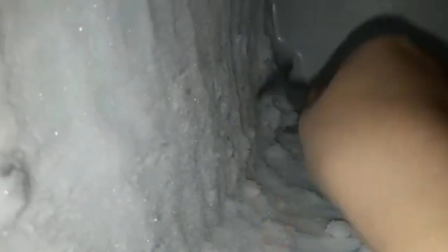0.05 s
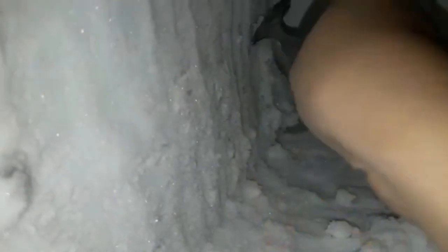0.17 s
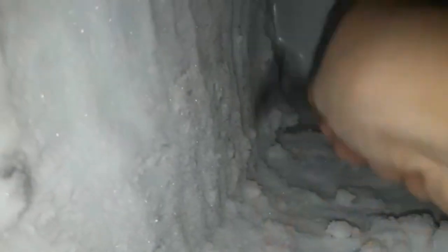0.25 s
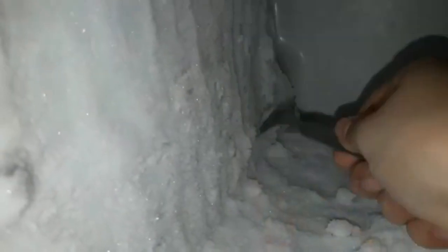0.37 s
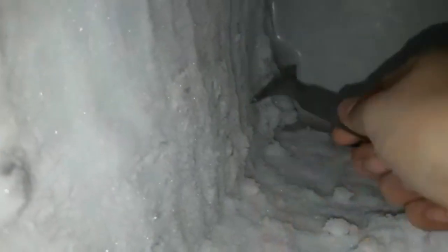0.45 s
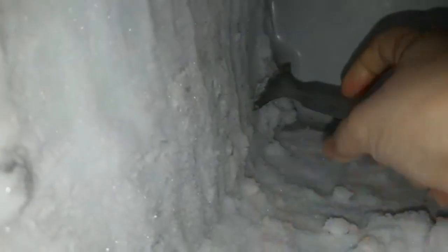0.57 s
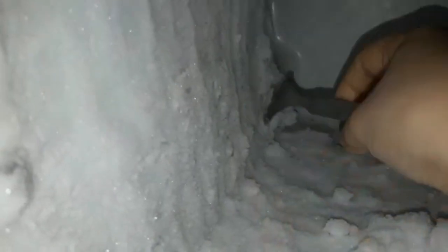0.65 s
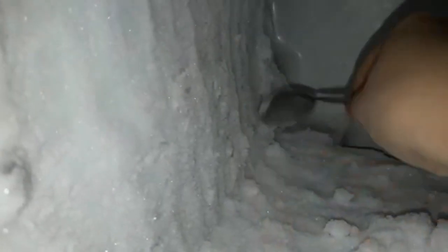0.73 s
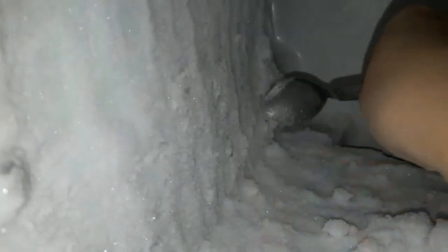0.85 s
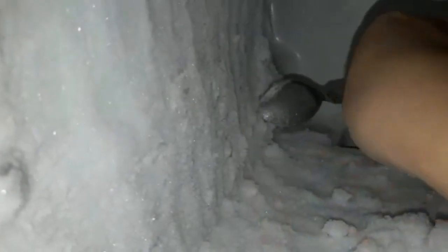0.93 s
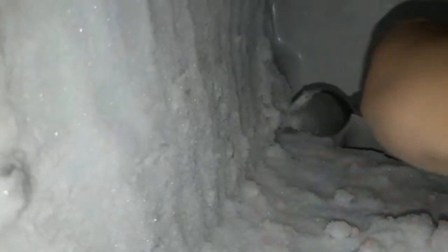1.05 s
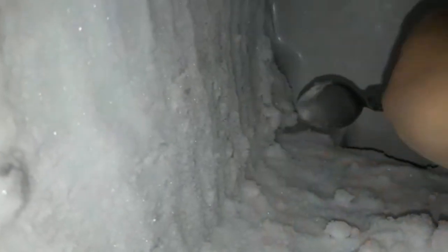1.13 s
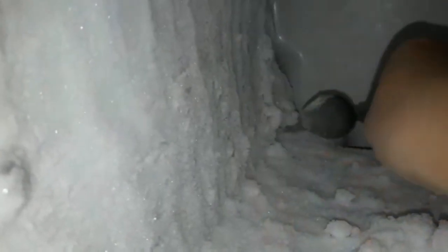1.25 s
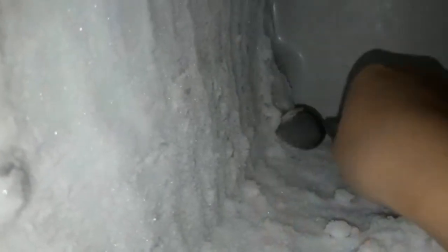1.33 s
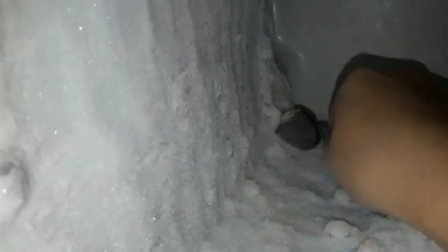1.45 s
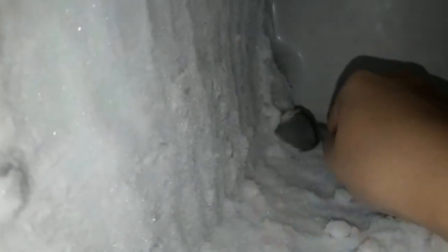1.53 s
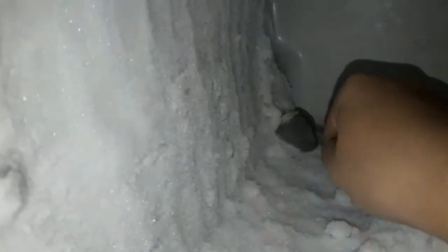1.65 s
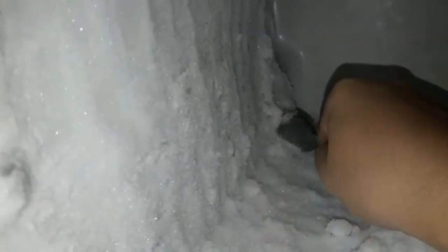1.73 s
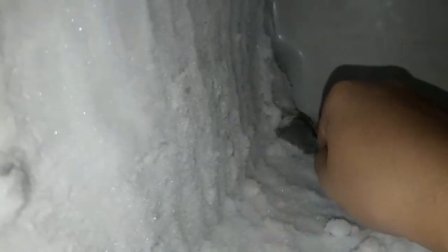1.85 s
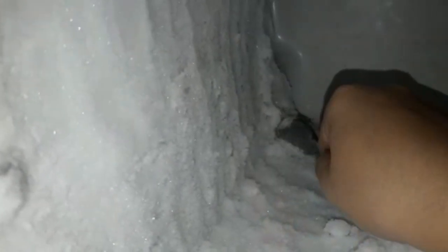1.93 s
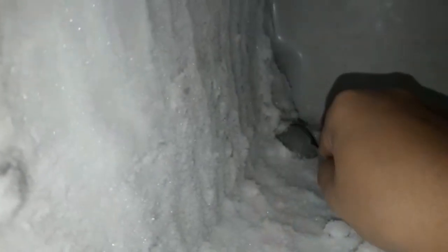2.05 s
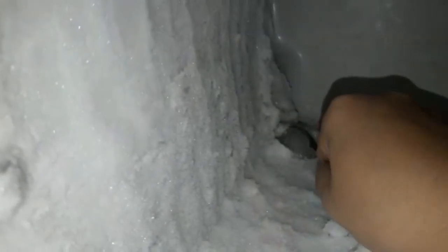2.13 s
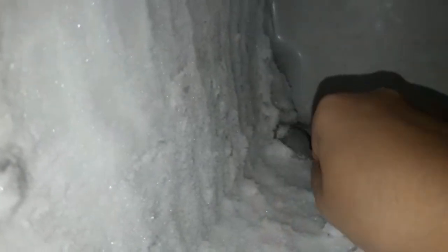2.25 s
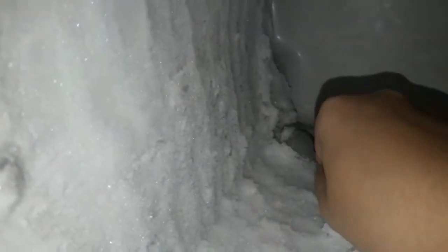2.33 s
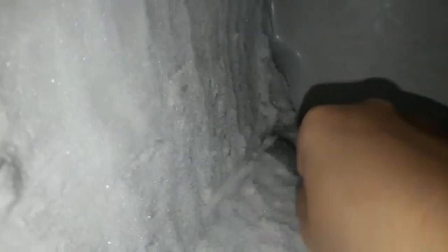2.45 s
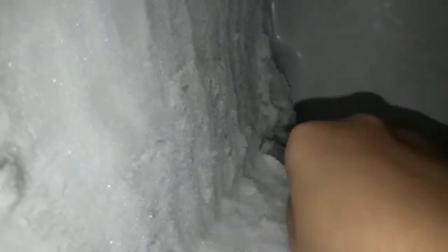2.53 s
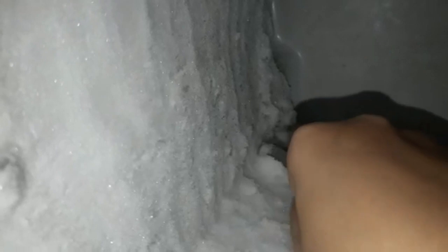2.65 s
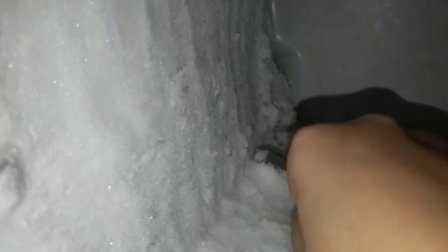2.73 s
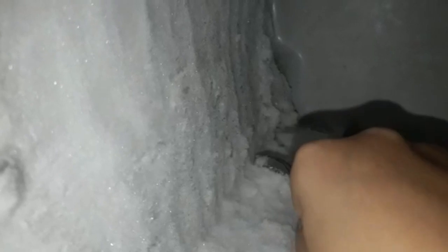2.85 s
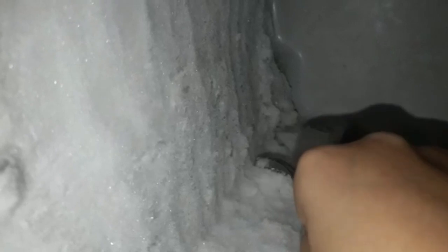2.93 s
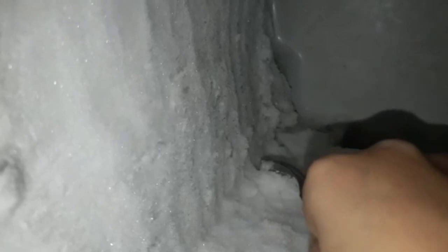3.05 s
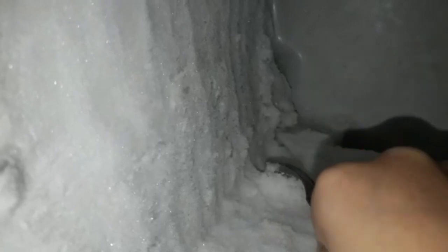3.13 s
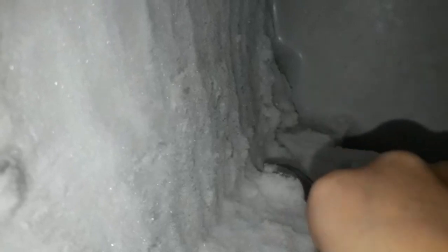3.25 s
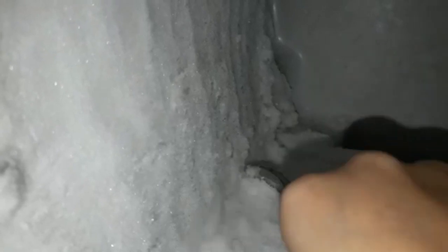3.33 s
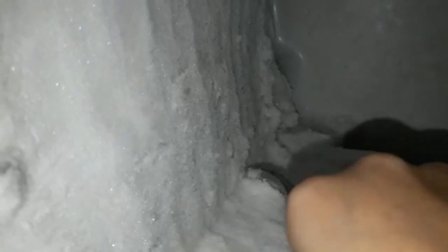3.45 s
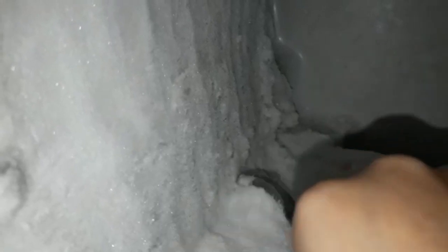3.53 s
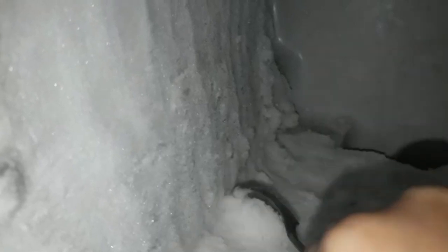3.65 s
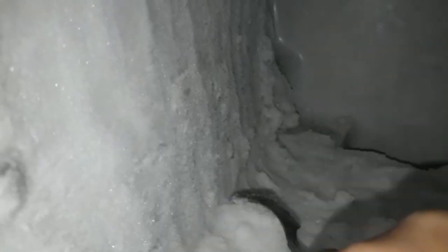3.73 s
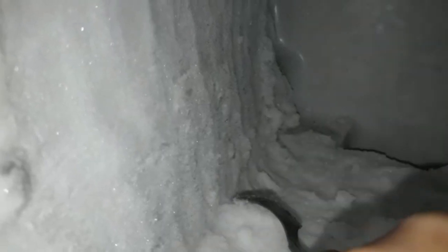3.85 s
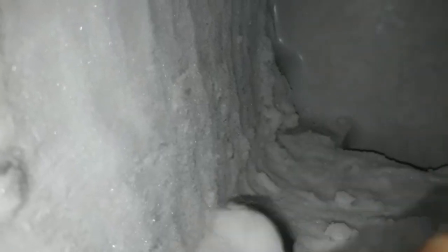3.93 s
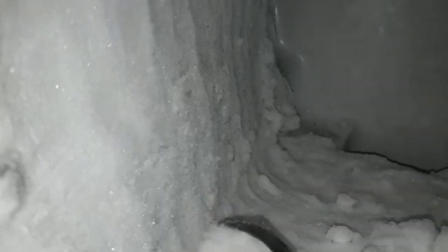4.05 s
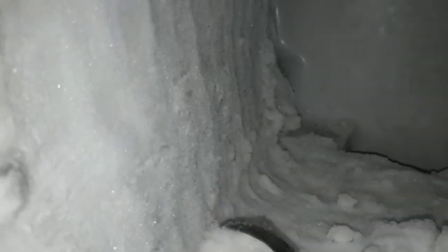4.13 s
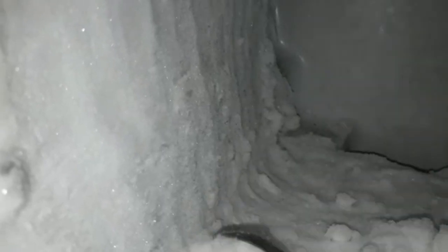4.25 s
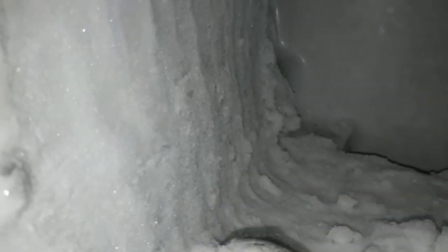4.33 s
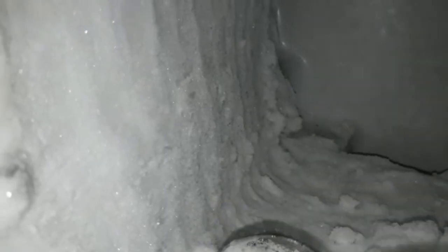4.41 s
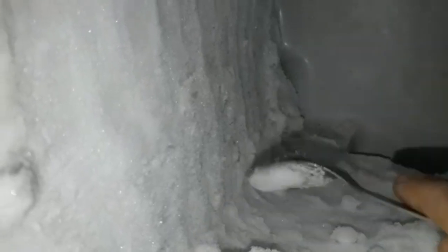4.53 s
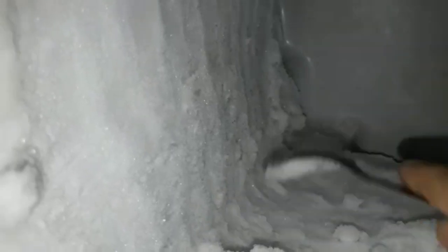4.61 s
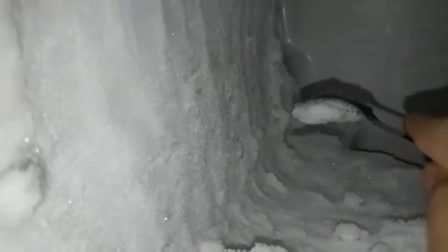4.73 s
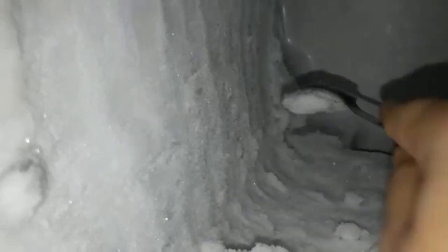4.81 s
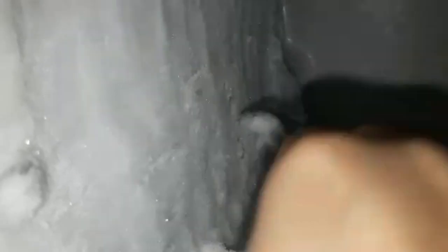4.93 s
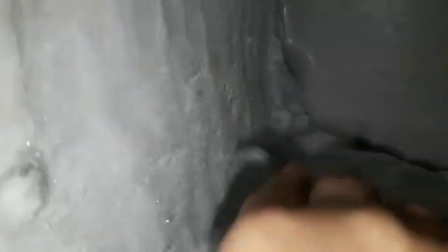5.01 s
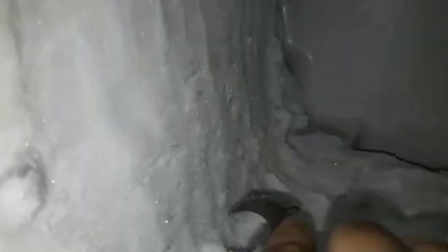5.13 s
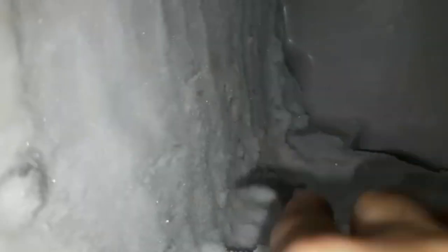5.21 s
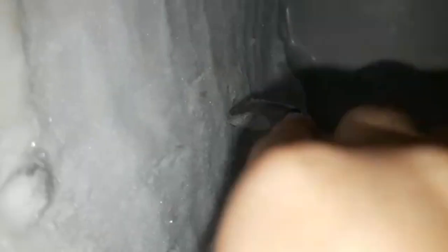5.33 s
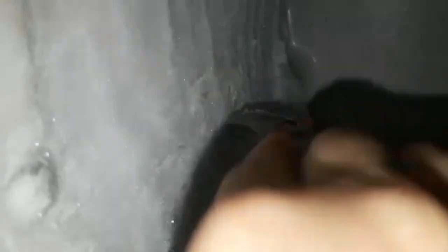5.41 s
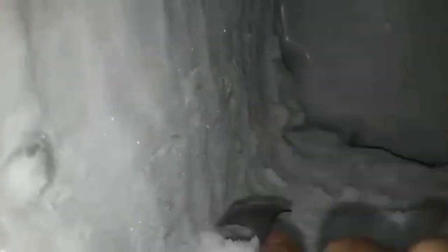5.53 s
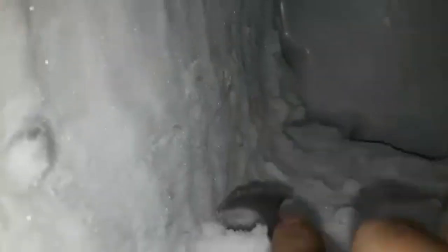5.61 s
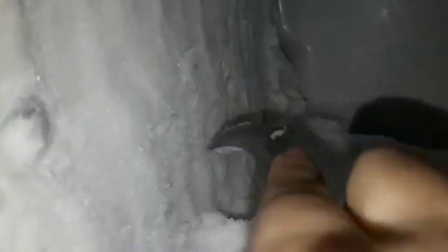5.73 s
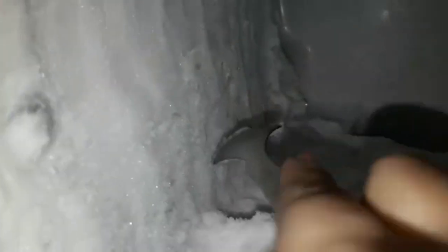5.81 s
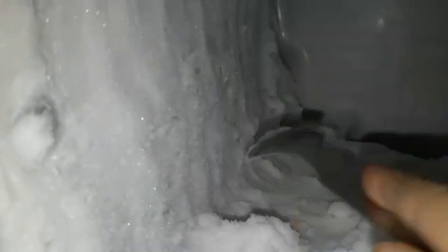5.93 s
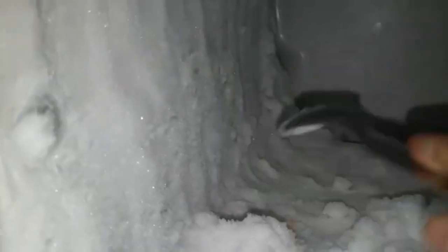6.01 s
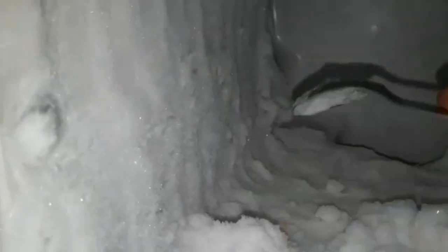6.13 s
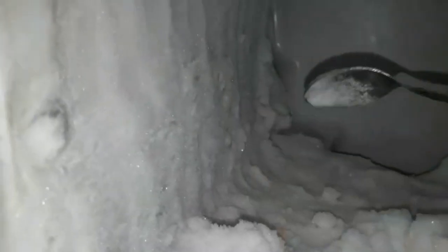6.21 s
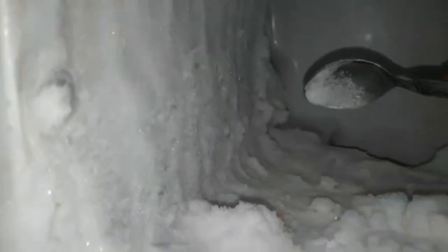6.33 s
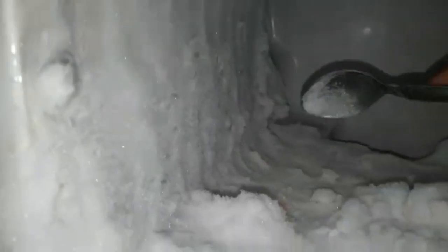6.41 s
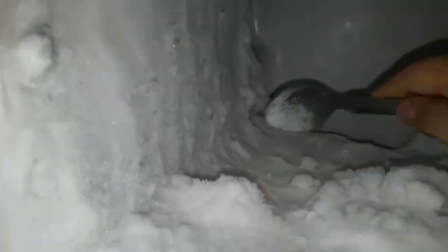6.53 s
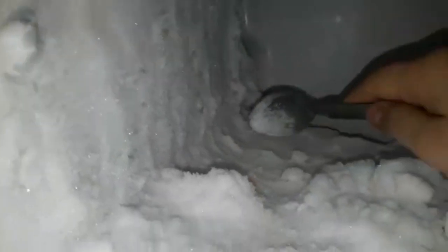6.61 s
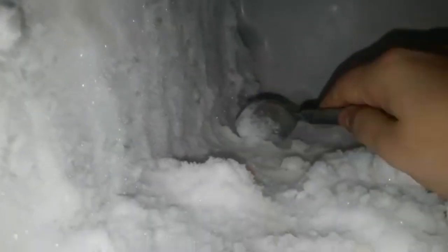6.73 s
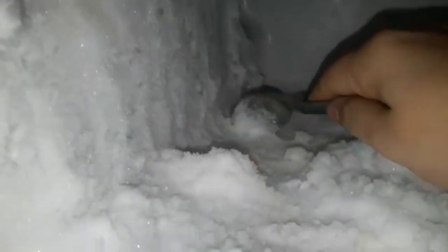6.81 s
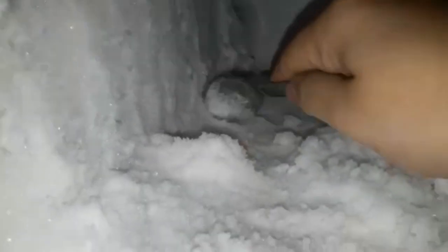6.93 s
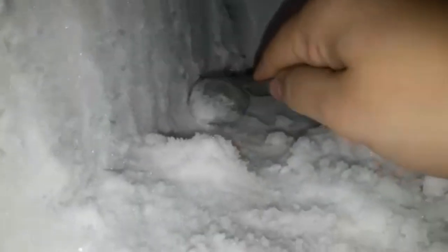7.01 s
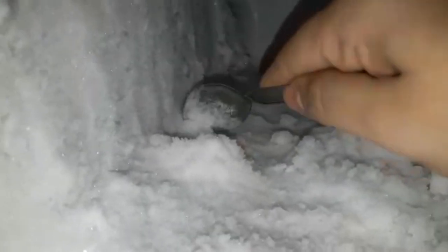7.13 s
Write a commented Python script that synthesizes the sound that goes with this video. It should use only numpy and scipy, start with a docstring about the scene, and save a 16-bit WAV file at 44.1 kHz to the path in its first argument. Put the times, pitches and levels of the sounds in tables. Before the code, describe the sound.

Close to a phone microphone, a steel spoon digs at packed frost in an open freezer. Small chips and scuffs come first, then harder crunching bites with longer gritty drags, a short lull, a rapid hollow clatter with a faint metallic ring, a quiet gap, and renewed scraping at the end. A low compressor hum runs underneath in an indoor kitchen.

```python
"""Heard first is a steel spoon scuffing and biting packed frost in an open freezer, close to a phone microphone.
Contact forces of noise, shaped as bites, scuffs and drags, excite the resonances of spoon, liner and air.
A wire shelf rings on, the cabinet thuds, and the kitchen returns a weak decaying tail.
Behind them a compressor hums as a sum of shaft orders, over a rumble and a hiss of filtered noise, all varying."""
import sys
import numpy as np
from scipy import signal
from scipy.fft import rfft, irfft, next_fast_len
from scipy.io import wavfile
from scipy.ndimage import uniform_filter1d, map_coordinates

SR = 44100
rng = np.random.default_rng(int(sys.argv[2]) if len(sys.argv) > 2 else 0)


def transcribe(u):
    """Save the signal u as a 16-bit wav file named by the first command-line argument.

    u: samples, shape (n,) or (channels, n), limited to [-1, 1]; the rate is SR.
    q: integer samples, one column per channel.
    """
    v = np.clip(np.atleast_2d(u).T, -1, 1)
    q = np.round(v * 32767).astype(np.int16)
    wavfile.write(sys.argv[1], SR, q)


N = 315756  # length in samples

# Bites and chips, levels before fixed offsets per body:
# start_s, crunch_db, liner_above_crunch_db, compartment_above_crunch_db
BITES = [(0.0195, -27, -4, -30), (0.154, -19, -10, -1.5), (0.2349, -31.5, -5, 20), (0.246, -13.5, -11, 1),
         (0.3033, -19, -8, -15), (0.4848, -30, -6, -2), (0.5775, -34, -4, -4.5), (0.7511, -20, -7, -3.5),
         (0.7803, -17, -7, -6.5), (0.914, -28.5, -3, -10), (1.344, -32, -10, -19.5),
         (1.357, -25, -14, -5.5), (1.3838, -26.5, -12, -19), (1.4292, -30, -8, -2.5),
         (1.5749, -23.5, -3.5, -4), (1.6789, -24.5, -7.5, -21), (1.805, -20, -2, -2),
         (1.8641, -20.5, -2, -4.5), (2.013, -11, 3.5, 3), (2.407, -20.5, -6, -11.5),
         (2.4139, -4.5, -14, -11), (2.617, -19, -2.5, -16), (2.703, -19.5, -11, -18),
         (3.2918, -3.5, -4.5, -8), (3.386, -34.5, -13, -11), (3.4112, -30, -16.5, -20),
         (3.441, -26, -7, -15), (3.539, -22, -2, -10), (3.974, -4.5, -5, -11), (4.0474, -24, 2.5, -26),
         (4.1262, -28.5, -3.5, -20), (4.2075, -18.5, -7, -21), (4.9292, -27.5, -0.5, 14.5),
         (4.9678, -17.5, -5, -1), (5.012, -14.5, -2, 0), (5.0357, -25, 7, 10.5), (5.0484, -11.5, 6.5, 1),
         (5.0858, -14.5, -4.5, -6.5), (5.117, -16.5, -8.5, -11), (5.3562, -37, 7.5, 17),
         (5.3906, -36, 1, 7), (5.4316, -24, 5.5, 4), (5.4697, -17.5, 5, 0.5), (5.4939, -6.5, -1, -15),
         (5.5313, -14, 0.5, -3), (5.5619, -22, 3.5, 4), (6.7057, -27, -19, -16.5),
         (6.7795, -19.5, -37, -17.5), (6.8798, -28, -13, -11), (6.8964, -29.5, -3, -8),
         (6.9099, -22.5, -6.5, -23), (6.9276, -5, -5.5, -4.5)]
# Short scuffs of the edge on the frost: start_s, end_s, crunch_start_db, crunch_middle_db, crunch_end_db,
# liner_above_crunch_db, compartment_above_crunch_db
SCUFFS = [(0, 0.046, -42, -51.5, -63, -0.5, 6), (0.148, 0.184, -36, -44.5, -62, 4.5, 14),
          (0.186, 0.236, -45, -42.5, -44, 0.5, 6.5), (0.236, 0.294, -32, -20.5, -39, 1.5, 8.5),
          (0.334, 0.436, -47.5, -43, -55.5, -3, -5), (0.733, 0.81, -60.5, -52, -53, -1, 12.5),
          (0.813, 0.842, -56, -41, -58, -7, -1), (0.883, 0.946, -45, -41.5, -40.5, -1, 3.5),
          (1.002, 1.06, -55, -55.5, -64, -5, -15), (1.345, 1.391, -43.5, -37.5, -54.5, 5.5, 6),
          (1.427, 1.524, -58, -54, -52, 5, -1), (1.571, 1.722, -44.5, -57.5, -53, 2.5, -3),
          (1.809, 1.906, -42.5, -63.5, -55.5, 5.5, 0.5), (2.22, 2.39, -62.5, -62, -60, -9.5, -9),
          (3.284, 3.345, -26, -37.5, -35, -2.5, 3.5), (3.736, 3.97, -67, -58.5, -60.5, 1.5, -11),
          (6.12, 6.158, -60, -63, -63, -16.5, -11)]
# Long drags through the frost, one pressure curve each: time_s, crunch_db, compartment_above_crunch_db
DRAGS = [
    [(1.955, -52, -5), (1.99, -56, 0), (2.005, -34.5, 5), (2.04, -38, 9.5), (2.085, -55, 6)],
    [(2.4, -32, 3), (2.435, -24.5, 4), (2.48, -37, -2), (2.56, -31.5, -1), (2.63, -32.5, -9),
     (2.698, -41.5, -2)],
    [(2.703, -34, 0), (2.755, -29.5, -7.5), (2.825, -44, 0)],
    [(2.83, -36.5, -4.5), (2.885, -38, -4), (2.905, -52.5, -6), (2.97, -45.5, -10), (3.03, -62, -6),
     (3.16, -58.5, -12), (3.205, -56.5, -7)],
    [(3.428, -42.5, -1.5), (3.53, -34.5, -4), (3.555, -30, -2.5), (3.6, -31.5, -7.5), (3.65, -40, -6),
     (3.685, -31.5, -4.5), (3.712, -51, -6.5)],
    [(3.967, -26, -5.5), (4.0, -32, -2.5), (4.07, -43.5, -6.5), (4.15, -49, -8), (4.19, -53, -6)],
    [(4.19, -43, -2.5), (4.245, -33.5, -6.5), (4.3, -36.5, -6), (4.42, -45.5, -3), (4.455, -56.5, -5)],
    [(4.94, -55.5, 23), (4.98, -43, 16.5), (5.03, -47.5, 17), (5.075, -30.5, 9.5), (5.11, -38, 8),
     (5.14, -52, 3), (5.21, -60, 11)],
    [(5.39, -43.5, 4), (5.44, -48.5, 22), (5.47, -36, 8), (5.515, -33.5, 9), (5.57, -48, 15),
     (5.61, -64, 4.5)],
    [(6.71, -50, -13), (6.77, -45, -8), (6.81, -47, -14), (6.84, -31, -9), (6.87, -50, -4), (6.92, -51, 2)],
    [(6.92, -48, 4), (6.955, -42.5, 0), (7.0, -31, -3.5), (7.04, -34.5, 1.5), (7.075, -44.5, 3.5),
     (7.16, -30, -4.5)],
]
# Where the spoon works. A positive lean moves weight from the lower to the upper modes of a body:
# time_s, spoon_lean_db, liner_lean_db, compartment_lean_db, shelf_reach_db, cabinet_reach_db
PLACE = [(.2, -0.5, 2, -3.5, 6, -9), (.9, 0.5, 5.5, -6.5, 2, -9.5), (1.4, -1, -1.5, 5.5, 4, -5.5),
         (2.5, 2, 1, 1, 2, -6.5), (3.3, 1, -2, 5, 5, -9), (3.6, -1, 2, 3, 5, -12.5),
         (4.3, 1, 5.5, -0.5, 6.5, -15), (4.93, -1.5, -6.5, -4, 11, -12.5), (5.6, -4, 0.5, -4, 19.5, -8),
         (6.75, 1.5, 1, 0, 11, -5), (7.1, -2.5, -0.5, 1, 7, -8.5)]
# Resonances of the compartment air: centre_hz, width_hz, relative_level_db
COMPARTMENT_MODES = [(348.2, 94, -7.5), (418, 168, -6), (499, 80, -5), (686, 110, -3), (810.4, 42, -4.5),
                     (819.6, 41, -4), (968, 43.3, 3.5), (1128, 131, -5), (1193, 110, -5.5)]
# Resonances of the freezer liner: centre_hz, width_hz, relative_level_db
LINER_MODES = [(1217, 180, -2), (1604, 226, 5), (1870, 44, 9.5), (1868, 37, 9), (2310, 530, -1),
               (2702, 83, 0.5)]
# Resonances of the spoon: centre_hz, width_hz, relative_level_db
SPOON_MODES = [(2770, 300, -5), (3517, 410, 0), (3904, 220, 0.5), (4380, 150, 0), (4690, 170, -0.5),
               (5270, 550, -3.5), (6440, 740, -6), (7460, 1000, -7.5), (8680, 710, -3), (9320, 1500, -6),
               (10800, 2500, -11.5), (12300, 890, -11.5), (12900, 710, -11.5), (14600, 1200, -17)]
# Resonances of the cabinet: centre_hz, width_hz, relative_level_db
CABINET_MODES = [(128, 35, -2), (182, 70, -0.9), (265, 47, 0.57)]
# Single resonance of a wire shelf: centre_hz, width_hz
SHELF_MODE = (607, 2.2)
# Reverberation of the kitchen: frequency_hz, t60_s
KITCHEN_DECAY = [(200, 1), (600, 0.55), (1800, 0.56), (3500, .25), (8000, 0.29)]
# Levels of the background hum, rumble and hiss over time: time_s, shaft_orders_db, rumble_db, hiss_db
BACKGROUND_LEVELS = [(0, -48.5, -45.5, -65.5), (.6, -47.5, -50.5, -64.5), (1.2, -44, -49.5, -62),
                     (1.7, -42.5, -41.5, -52.5), (2.2, -41.5, -47.5, -58.5), (2.8, -48, -52, -68),
                     (3.2, -51, -54.5, -64.5), (4, -50.5, -52, -63), (4.7, -50.5, -55.5, -69.5),
                     (5.7, -48.5, -48.5, -65.5), (6.3, -55, -54.5, -68), (6.6, -45.5, -53, -67.5),
                     (7.16, -43, -41, -46.5)]
# Compressor harmonics: multiple_of_shaft_speed, relative_level_db
SHAFT_ORDERS = [(2, -7.5), (3, 1), (4, -15.5), (5, -16), (6, -21), (9, -21)]
# Spectrum of the background rumble: frequency_hz, relative_density_db_per_hz
RUMBLE_SPECTRUM = [(20, -41.5), (50, -22), (85, -7.5), (125, -6.5), (170, -6.5), (230, -16), (320, -26),
                   (450, -23.5), (600, -21), (850, -27), (1200, -29.5), (2500, -41.5), (5500, -120)]
# Spectrum of the background hiss: frequency_hz, relative_density_db_per_hz
HISS_SPECTRUM = [(1200, -33.5), (1700, -6.5), (2600, -6.5), (3500, -9), (3940, -5), (4400, -7.5),
                 (5300, -11), (6000, -13), (8100, -11), (8550, -11.5), (9000, -8), (9600, -6),
                 (10200, -20.5), (13000, -22), (15800, -29.5)]

# A bite: time constant of its rise, its decay time, and the delay from start_s to its crack
GATHER_S, CRUMBLE_T60_S, CRACK_LAG_S = 0.0013, 0.044, 0.0016
EDGE_S = 0.0021  # time the edge takes to land and to lift
TRICKLE_S, TRICKLE_DB = 0.023, -20  # loose crystals: decay time constant and level
# In a drag the liner sits this far above the crunch and follows the compartment by this share
LINER_DB, LINER_FOLLOWS = -0.5, 0.43
SHAFT_HZ = 49.26  # mean shaft speed
TOP_HZ = 15750  # centre of the upper band edge


def frost():
    """Forced vibration: one contact excites the modes of spoon, liner, enclosed air, shelf and cabinet."""
    spoon_force, liner_force, air_force = drag() + bites()
    spoon_lean_db, liner_lean_db, air_lean_db, shelf_db, cabinet_db = curves(PLACE)
    shelf = filtered(air_force * amp(shelf_db), lambda f: resonance(f, *SHELF_MODE))
    flutter = amp(4.1 * wobble(25))
    cabinet_force = spoon_force + amp(-9.5) * air_force
    thud = amp(cabinet_db) * ringing(cabinet_force, CABINET_MODES, 0)
    spoon = ringing(spoon_force, SPOON_MODES, spoon_lean_db)
    liner = ringing(liner_force, LINER_MODES, liner_lean_db)
    air = ringing(air_force, COMPARTMENT_MODES, air_lean_db)
    # spoon, liner and cabinet enter with the opposite sign to the air, so neighbouring modes of different
    # bodies add rather than cancel
    return air - (spoon + liner + thud) + shelf * flutter


def bites():
    """Brittle fracture: force gathers exponentially, cracks in an impulse and crumbles exponentially away."""
    lead = SR // 100  # samples before the crack
    t = (np.arange(SR // 8) - lead) / SR
    swell = np.minimum(np.exp(t / GATHER_S), amp(-60 * t / CRUMBLE_T60_S))
    force = np.zeros((3, N + SR))
    grit = np.resize(crystals(clump_db=0.64, spike_db=4.5), N + SR)
    for start_s, crunch_db, liner_db, air_db in BITES:
        at = round((start_s + CRACK_LAG_S) * SR) - lead + np.arange(len(t))
        burst = swell * grit[at]
        burst *= np.linalg.norm(swell) / np.linalg.norm(burst)  # equal noise energy before the table's gain
        burst[lead:lead + 3] += [3, 6, 3]  # the lump breaks off in one short crack
        body_db = [[crunch_db - 11.5], [crunch_db + liner_db - 7.5], [crunch_db + air_db - 5]]
        force[:, at] += amp(body_db) * burst
    return angles(force[:, :N], depth_db=2.5)


def drag():
    """Friction noise: edge pressure modulates breaking crystals, and loose ones trickle on as it lifts."""
    force = np.zeros((3, N))
    for start_s, end_s, *crunch_db, liner_db, air_db in SCUFFS:
        at = span(start_s, end_s)
        knots_s = [start_s, (start_s + end_s) / 2, end_s]
        pressure = amp(np.interp(at / SR, knots_s, crunch_db))
        force[:, at] += amp([[0], [liner_db], [air_db]]) * pressure
    for rows in DRAGS:
        time_s, crunch_db, air_db = np.transpose(rows)
        at = span(time_s[0], time_s[-1])
        liner_db = crunch_db + LINER_DB + LINER_FOLLOWS * air_db
        columns = (crunch_db, liner_db, crunch_db + air_db)
        force[:, at] += amp([np.interp(at / SR, time_s, db) for db in columns])
    keep = np.exp(-1 / (TRICKLE_S * SR))
    trickle = amp(TRICKLE_DB) * signal.lfilter([1 - keep], [1, -keep], force)
    contact = uniform_filter1d(force, size=max(1, round(EDGE_S * SR)))
    scrape = (contact + trickle) * crystals(clump_db=2, spike_db=3.5)
    return angles(scrape, depth_db=3)


def crystals(clump_db, spike_db):
    """Random fracture: noise whose level varies slowly in clumps and quickly from snap to snap."""
    clumps = clump_db * (wobble(45) + wobble(160))
    return unit(rng.standard_normal(N) * amp(clumps + spike_db * wobble(1500)))


def angles(force, depth_db):
    """Angle-dependent coupling: as the spoon turns, narrow bands swell and fade over a fraction of a second."""
    spectrum = signal.stft(force, nperseg=512)[2]
    noise = rng.standard_normal(spectrum.shape[1:])
    across_bands = uniform_filter1d(noise, size=3, axis=0)
    field = uniform_filter1d(across_bands, size=50, axis=1)
    gain = amp(depth_db * unit(field))
    return signal.istft(spectrum * unit(gain), nperseg=512)[1][:, :N]


def ringing(force, modes, lean_db):
    """Modal superposition: a force drives resonances of alternating sign; lean favours the upper half."""
    signed = [((-1) ** k * amp(db), hz, width) for k, (hz, width, db) in enumerate(modes)]

    def body(f, part):
        """Superposition of the responses of some modes."""
        return sum(gain * resonance(f, hz, width) for gain, hz, width in part)

    half = len(modes) // 2
    low = filtered(force * amp(-lean_db / 2), lambda f: body(f, signed[:half]))
    high = filtered(force * amp(lean_db / 2), lambda f: body(f, signed[half:]))
    # without lean, white force of rms 1 gives about rms 1
    power = np.mean(np.abs(body(np.linspace(0, SR / 2, num=8000), signed)) ** 2)
    return (low + high) / np.sqrt(power)


def resonance(f, hz, width):
    """Damped oscillator: unit response at its centre, falling off over its width."""
    return 1j * f * width / (hz * hz - f * f + 1j * f * width)


def kitchen(x):
    """Reverberation: diffuse noise whose frequencies each decay with their own t60, convolved with the source."""
    hz, t, spectrum = signal.stft(rng.standard_normal(SR), SR, nperseg=256)
    decay = amp(-60 * t / along(KITCHEN_DECAY, hz)[:, None])
    tail = signal.istft(spectrum * decay, SR, nperseg=256)[1]
    return signal.fftconvolve(x, tail / np.linalg.norm(tail))[:N]


def background():
    """Harmonic and broadband sound: unsteady compressor shaft orders, with rumble and hiss as filtered noise."""
    orders_db, rumble_db, hiss_db = curves(BACKGROUND_LEVELS)
    turn = 2 * np.pi * np.cumsum(SHAFT_HZ * (1 + 0.003 * wobble(3))) / SR
    orders = np.zeros(N)
    for multiple, db in SHAFT_ORDERS:
        level = amp(db + 2.0 * wobble(36))
        orders += level * np.sin(multiple * turn + 0.19 * wobble(15))
    rumble = filtered(rng.standard_normal(N), lambda hz: amp(along(RUMBLE_SPECTRUM, hz)))
    hiss = filtered(rng.standard_normal(N), lambda hz: amp(along(HISS_SPECTRUM, hz)))
    low = amp(orders_db) * unit(orders) + amp(rumble_db) * unit(rumble)
    return low + amp(hiss_db + 0.69 * wobble(5.2)) * unit(hiss)


def amp(db):
    """Decibel law: level to amplitude gain."""
    return 10 ** (np.asarray(db) / 20)


def unit(x):
    """Normalisation: scale to rms 1."""
    return x / np.sqrt(np.mean(x ** 2) + 1e-20)


def span(start_s, end_s):
    """Sampling: the sample indices of a stretch of time."""
    return np.arange(round(start_s * SR), min(round(end_s * SR), N))


def along(points, hz):
    """Interpolation of (frequency_hz, value) points on a logarithmic frequency axis."""
    f, v = np.transpose(points)
    return np.interp(np.log(hz + 1), np.log(f + 1), v)


def curves(rows):
    """Interpolation in time: one value per sample for each column after time_s."""
    time_s, *columns = np.transpose(rows)
    return [np.interp(np.arange(N) / SR, time_s, column) for column in columns]


def wobble(rate):
    """Band-limited fluctuation: a smooth random curve with rate knots a second."""
    knots = rng.standard_normal(int(N * rate / SR) + 4)
    return map_coordinates(knots, [np.arange(N) * rate / SR])


def filtered(x, response):
    """Linear filtering: the spectrum of x times a complex response of frequency."""
    m = next_fast_len(N + SR // 2)
    return irfft(rfft(x, m) * response(np.fft.rfftfreq(m, 1 / SR)), m)[..., :N]


def scene():
    """Superposition of the worked frost, its room tail and the background."""
    near = frost()
    return (near + amp(-22.5) * kitchen(near) + background())[None]


def record(dry):
    """Band limiting: the microphone drops the deep bass, and a steep edge removes everything above the limit."""

    def response(hz):
        """First-order high-pass at 40 Hz times the upper edge, 300 Hz wide."""
        edge = np.clip((TOP_HZ + 150 - hz) / 300, 0, 1) ** 3
        return 1j * hz / (40 + 1j * hz) * edge

    return filtered(dry, response)


dry = scene()
out = record(dry)
transcribe(out)
```